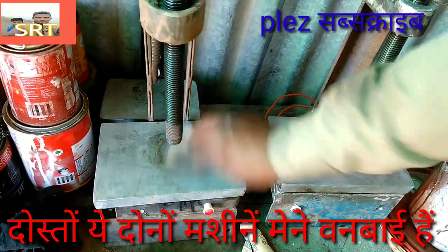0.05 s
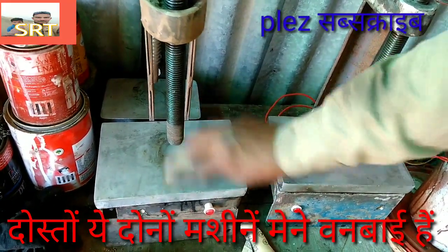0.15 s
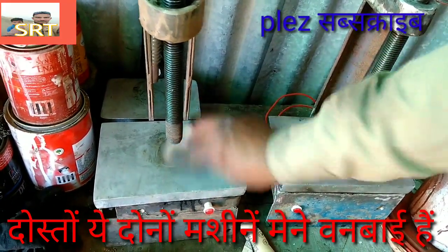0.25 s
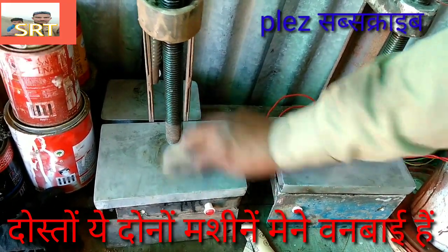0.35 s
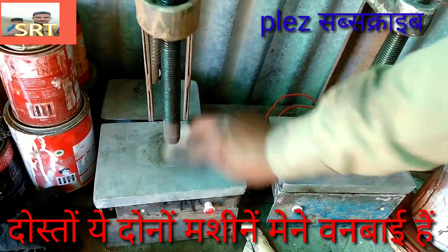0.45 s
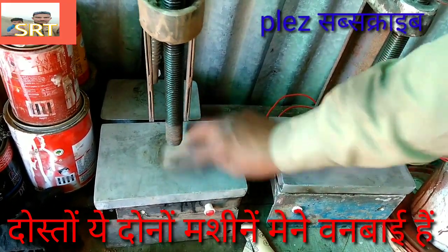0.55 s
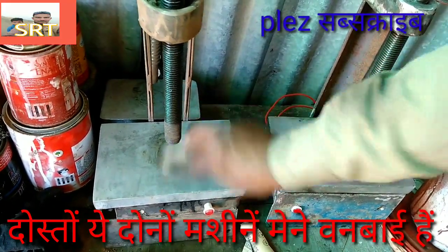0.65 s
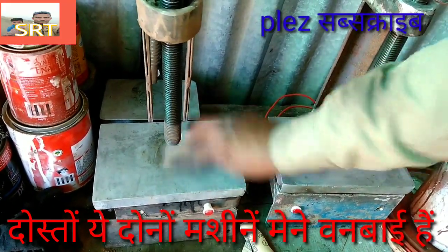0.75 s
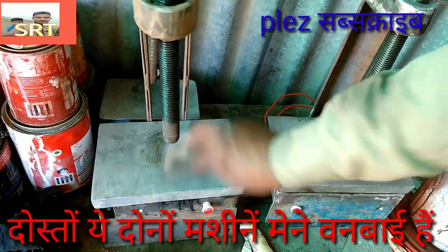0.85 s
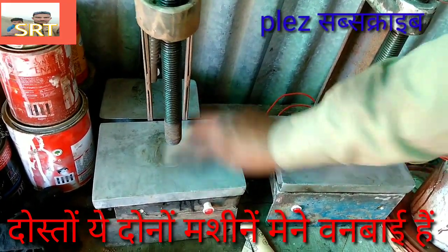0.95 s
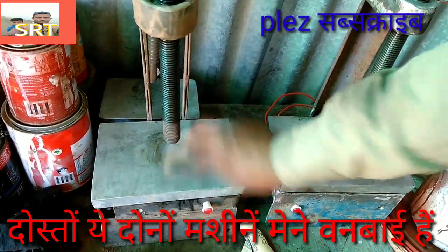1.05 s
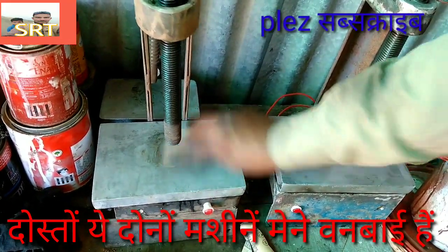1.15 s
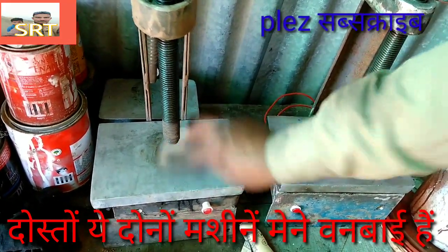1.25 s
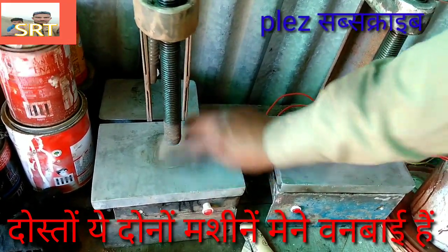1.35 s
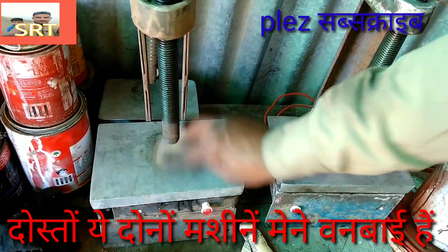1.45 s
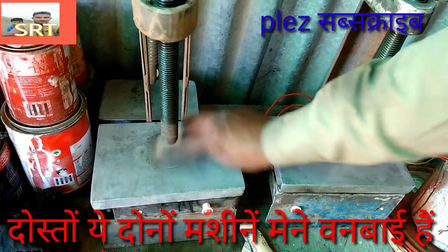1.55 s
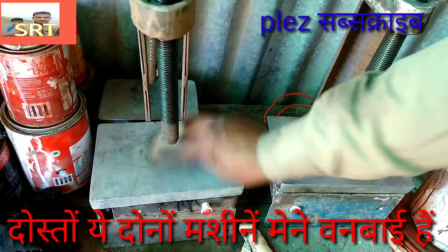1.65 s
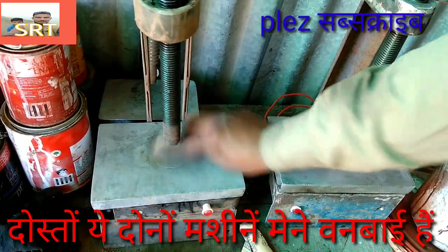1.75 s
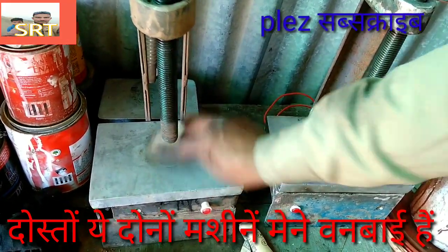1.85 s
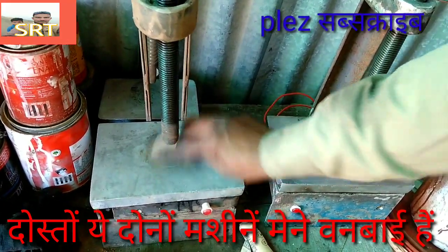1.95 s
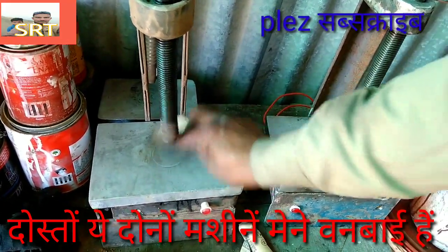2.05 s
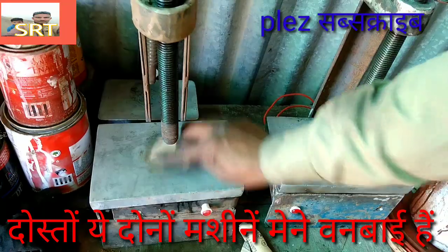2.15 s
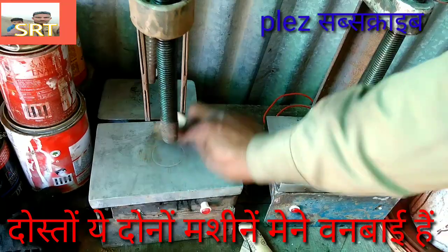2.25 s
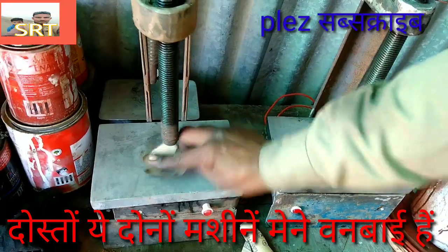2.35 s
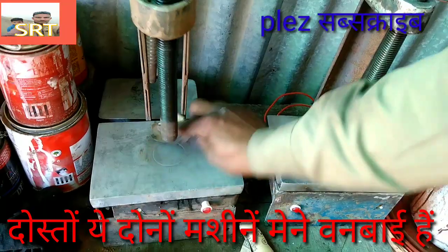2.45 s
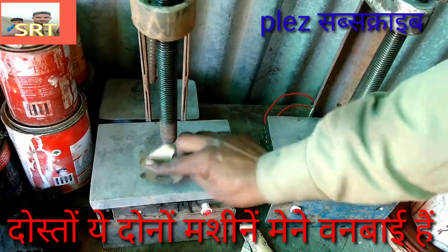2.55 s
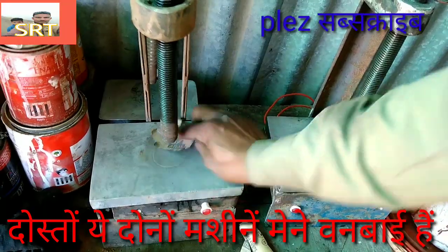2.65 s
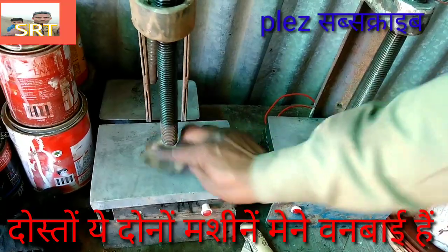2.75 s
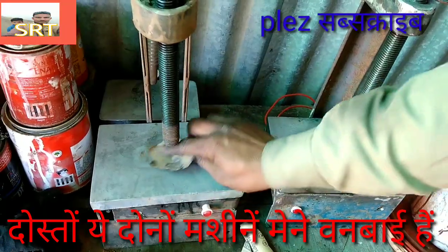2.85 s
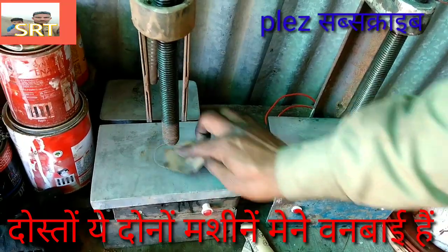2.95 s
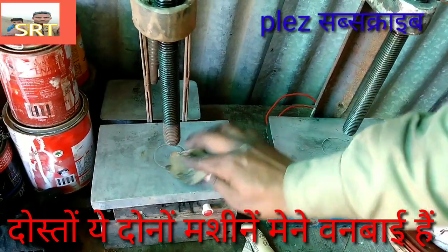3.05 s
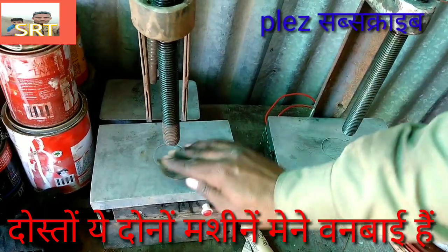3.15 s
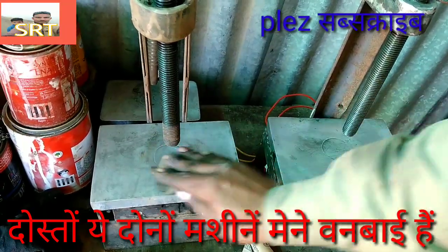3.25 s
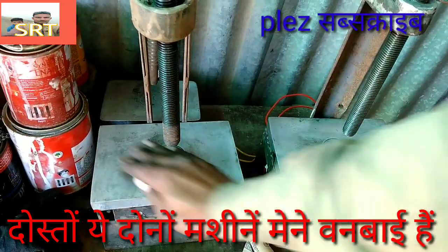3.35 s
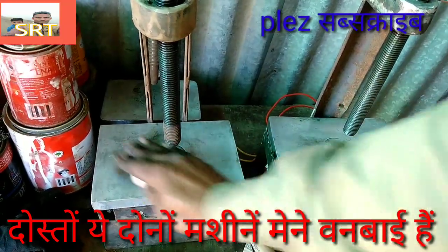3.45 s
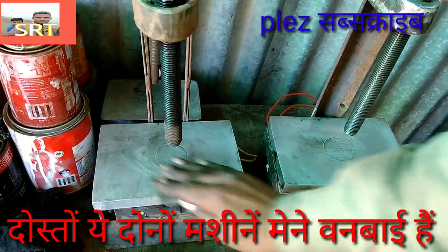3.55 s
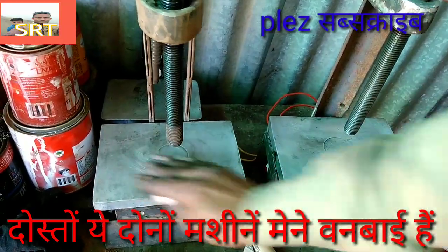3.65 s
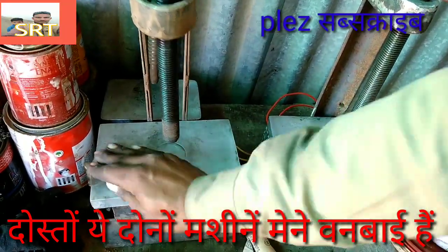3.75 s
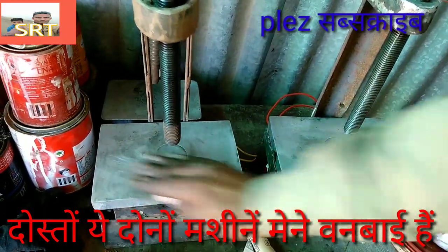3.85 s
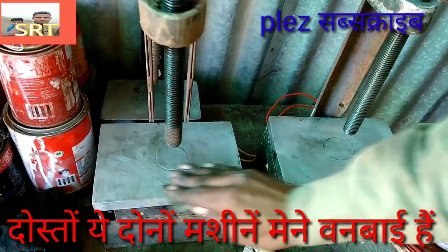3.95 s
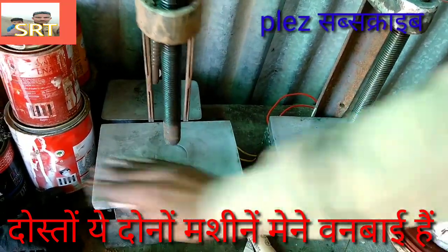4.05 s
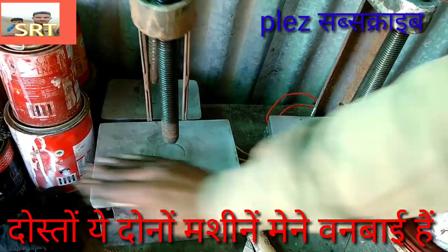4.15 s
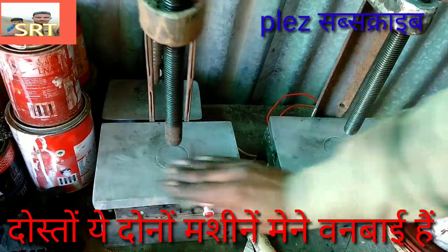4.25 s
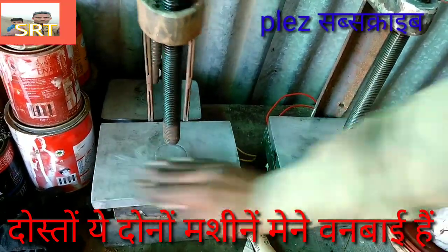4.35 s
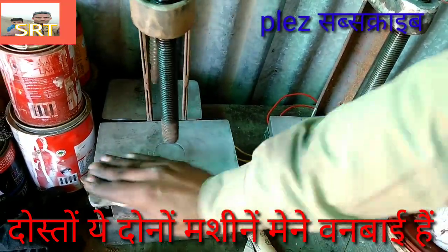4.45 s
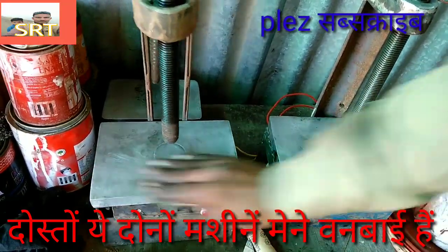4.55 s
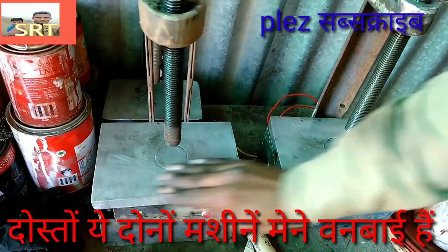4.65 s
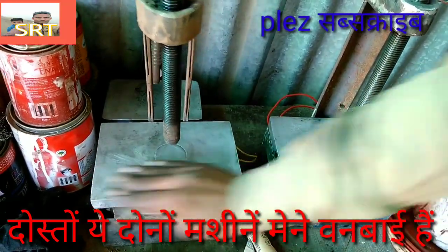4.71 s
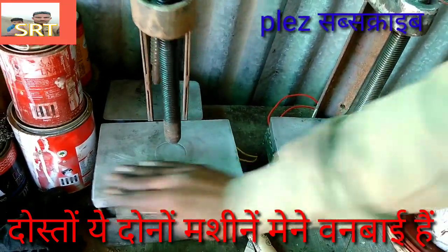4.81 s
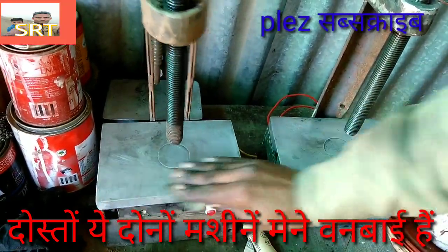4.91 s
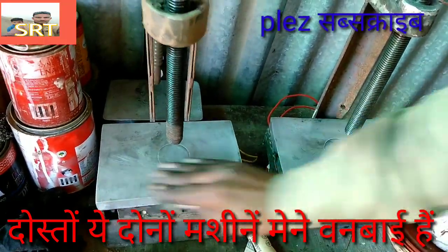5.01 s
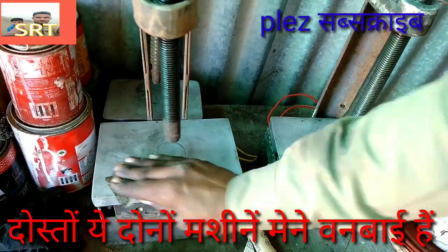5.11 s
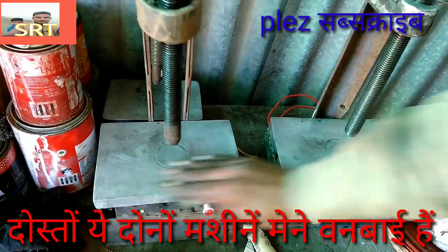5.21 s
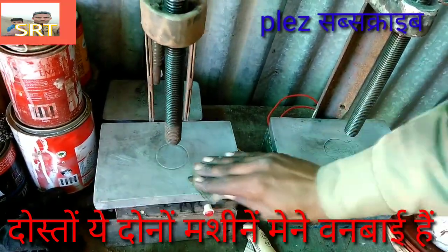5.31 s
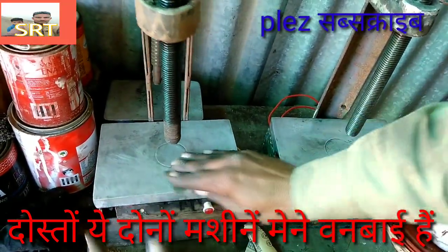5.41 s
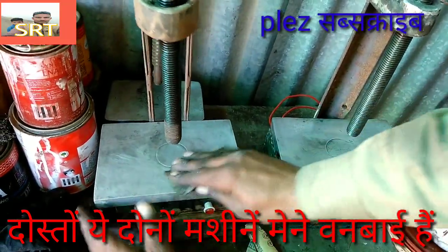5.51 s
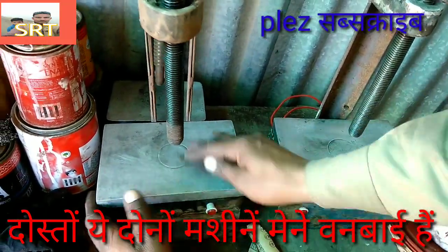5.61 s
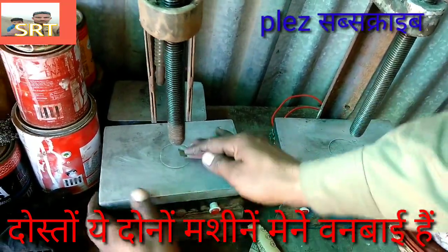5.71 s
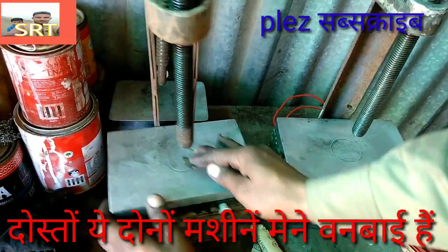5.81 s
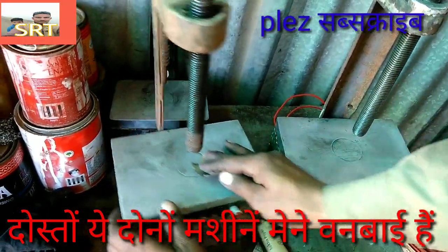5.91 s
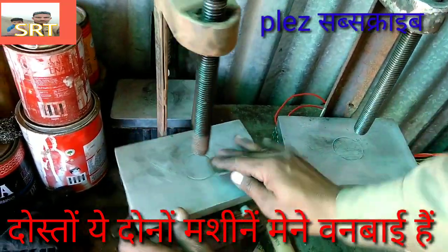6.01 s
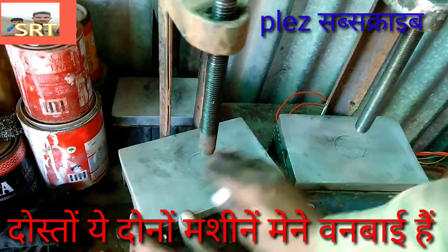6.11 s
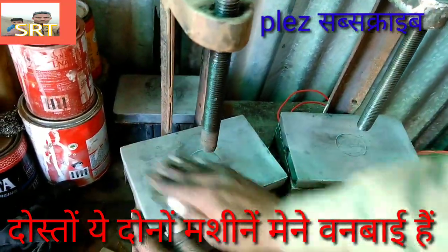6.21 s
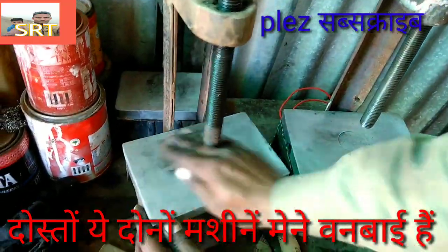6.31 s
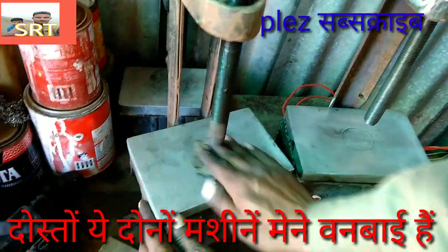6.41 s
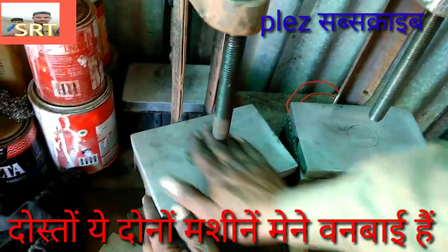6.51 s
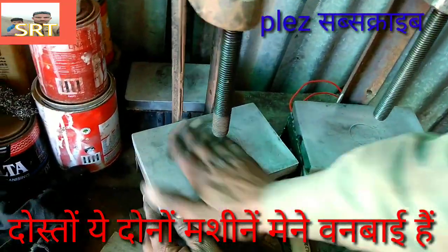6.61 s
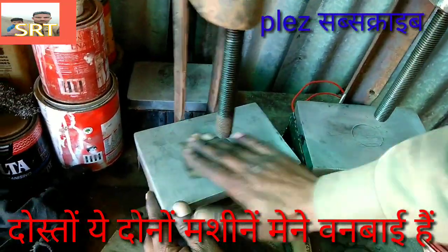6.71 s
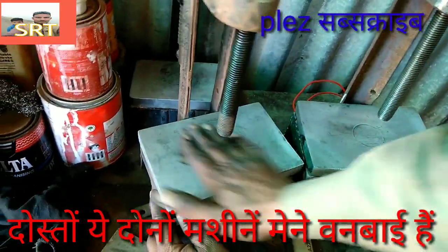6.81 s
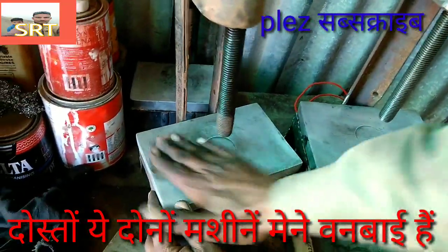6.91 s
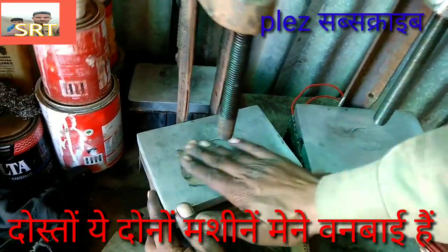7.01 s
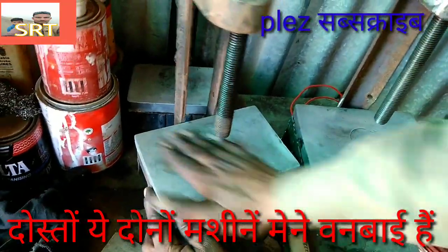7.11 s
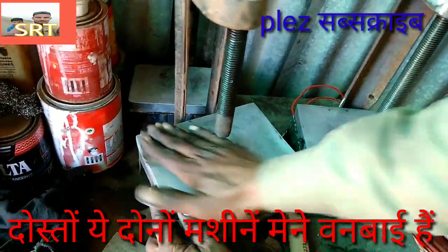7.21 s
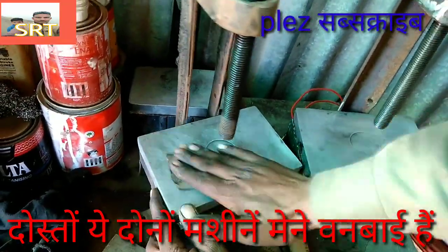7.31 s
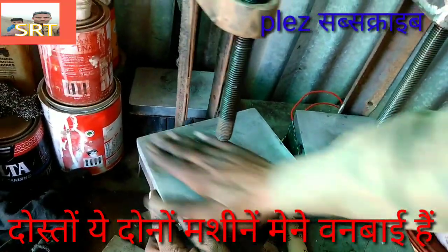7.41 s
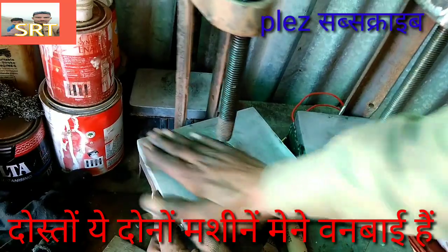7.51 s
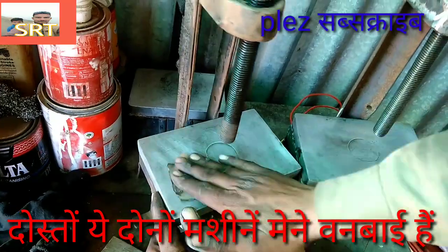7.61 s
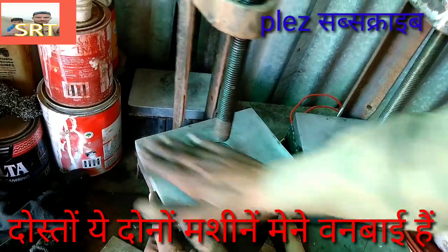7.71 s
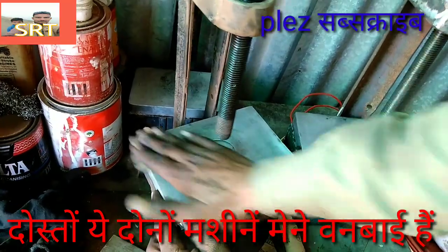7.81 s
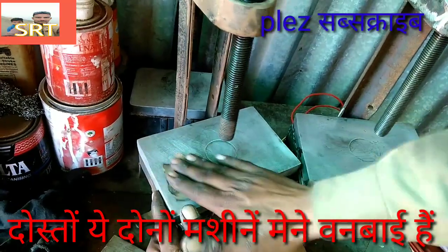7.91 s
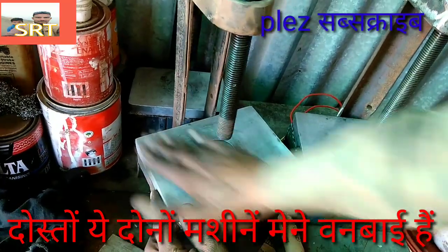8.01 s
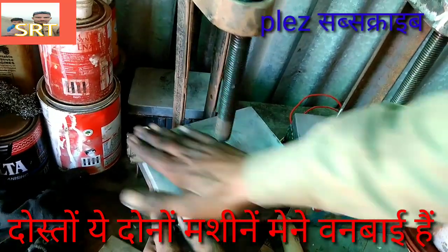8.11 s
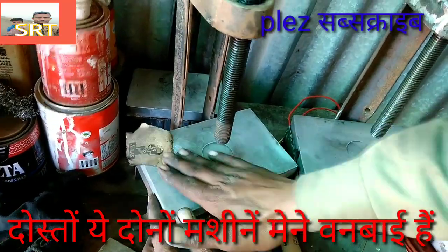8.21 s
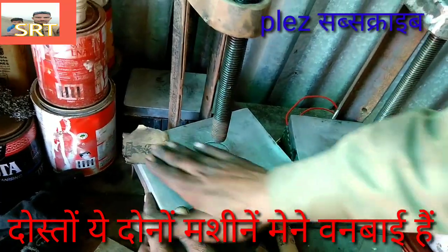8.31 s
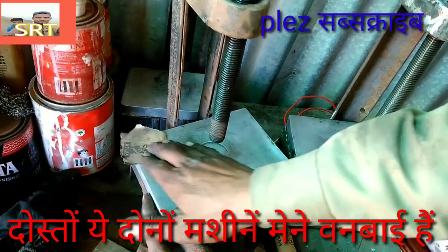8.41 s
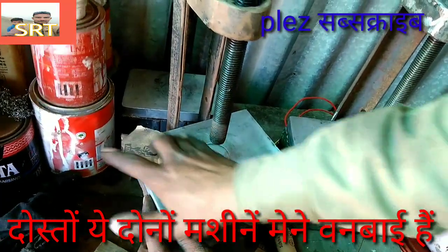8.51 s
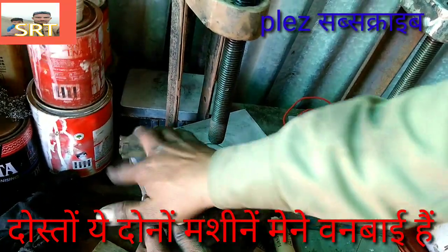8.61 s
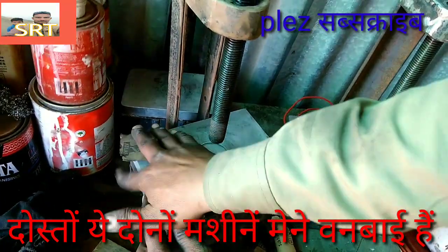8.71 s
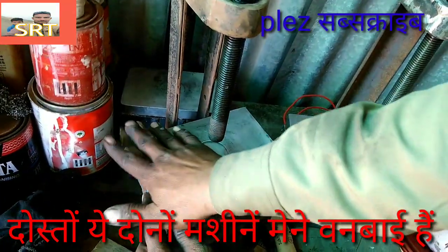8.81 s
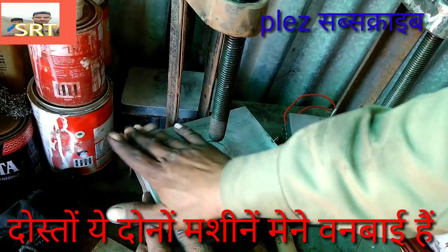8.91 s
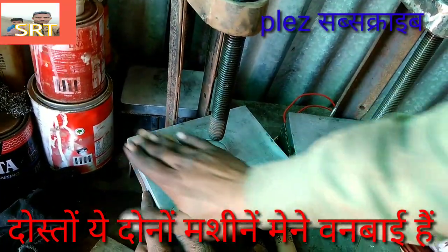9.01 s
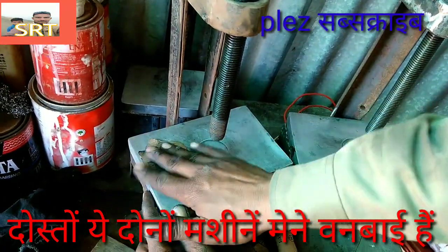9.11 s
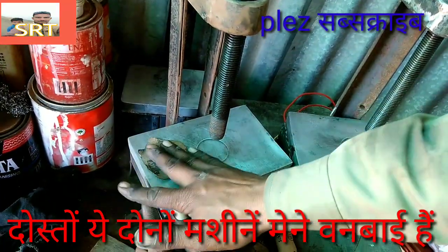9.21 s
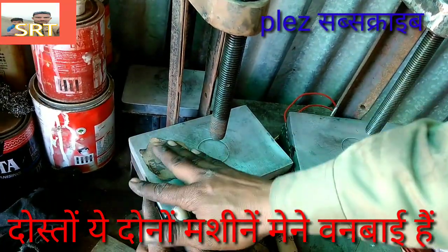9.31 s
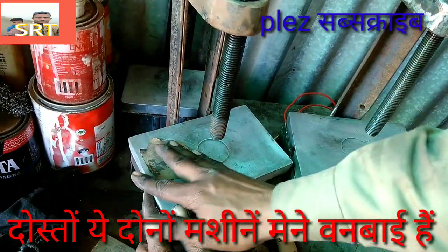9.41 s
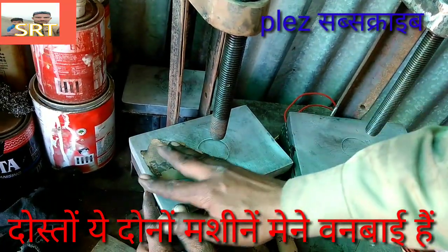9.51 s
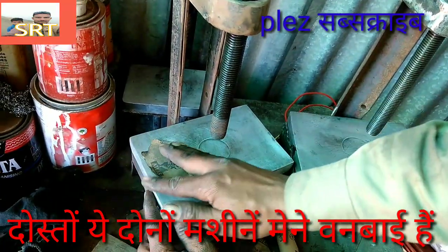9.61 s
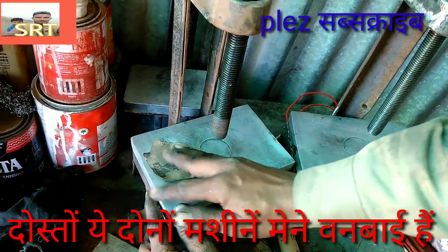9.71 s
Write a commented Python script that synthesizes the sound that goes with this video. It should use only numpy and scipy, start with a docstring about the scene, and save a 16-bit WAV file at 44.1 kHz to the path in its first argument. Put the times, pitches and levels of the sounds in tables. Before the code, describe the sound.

Close, dry stereo in a small tin-walled workshop with a faint low rumble. From 0 to 2.8 seconds sandpaper scrubs a steel plate in very quick strokes, about ten a second, each a bright gritty hiss with a thinner rasp; dull thuds and short clanks become denser after 2 seconds. Around 2.9 to 3.3 the rubbing weakens, with a scuff and papery snap. From 3.3 to 5.5 come longer, steadier sweeps, about six a second, with heavy knocks and juddering rumble, and a soft distant wash rising. At 5.7 to 6.1 the plate is swung round with a low grind, gritty crackle and sharp paper snaps. A long stroke follows, then brisk sweeps until 8.3, with the hardest clanks near 7.3 and 7.9. Afterwards light slides, one weak stroke around 9 with a snap, and faint wavering far-off tones.

```python
"""Sandpaper hisses and rasps over a steel plate in a small tin-walled workshop: quick short strokes, then longer sweeps.
The loose plate knocks and rumbles on its press, and midway it is swung round with a low grinding.
At the end the paper only slides lightly, and faint tones drift in from far away.
The paper is coloured noise driven by the speed of the hand; the knocks are blows and tiny bounces that ring
decaying modes; the rumble is low juddering noise; noise-like echoes make the room."""
import sys
import numpy as np
from scipy import signal
from scipy.fft import rfft, irfft
from scipy.io import wavfile
from scipy.ndimage import uniform_filter1d, map_coordinates

SR = 44100
rng = np.random.default_rng(int(sys.argv[2]) if len(sys.argv) > 2 else 0)


def persist_wave(psi):
    """Save psi, clipped to +-1, as 16-bit WAV."""
    counts = np.round(np.clip(psi, -1, 1) * 32767).astype(np.int16)
    wavfile.write(sys.argv[1], SR, np.atleast_2d(counts).T)


N = 430416
TIME = np.arange(N) / SR
BINS_HZ = np.maximum(np.fft.rfftfreq(N, 1 / SR), 1)

# All levels in the tables are relative: each layer's own trim and the room come on top.

# Workshop background colour. Each row: frequency in Hz, density in dB per Hz.
AMBIENCE_COLOUR = [(18, -2), (27, 8), (42, -6), (65, -3.5), (95, -6), (170, -15), (300, -12), (550, -14),
                   (750, -59), (1700, -54), (3000, -31.5), (8000, -31), (15000, -42)]
# A distant wash that swells and fades. Each row: time in seconds, level in dB.
WASH_LEVEL = [(0, -90), (3.3, -58), (3.9, -35), (4.7, -39), (5.5, -32.5), (6.1, -30.5), (6.6, -42.5),
              (8.2, -77), (8.6, -44.5), (9.3, -50.5), (9.75, -40)]
# Colour of the wash. Each row: frequency in Hz, density in dB per Hz.
WASH_COLOUR = [(200, 3), (600, 5), (900, 4), (1500, 4), (2200, 1.5), (3200, -12), (6000, -21)]
# Faint far hum and tones. Each row: start in seconds, end in seconds, level in dB, from Hz, to Hz.
FAR_TONES = [(8.504, 9.85, -45, 95, 91), (8.5, 8.88, -54, 2000, 1745), (8.85, 9.18, -46.5, 1700, 1800),
             (9.2, 9.9, -45.5, 190, 192), (9.34, 9.62, -46.5, 838, 805), (9.41, 9.9, -44, 618, 592),
             (9.4, 9.68, -49, 1800, 1605)]
# Likeness of the left and right channels. Each row: frequency in Hz, correlation from -1 to 1.
LIKENESS = [(60, .98), (190, .98), (330, .85), (500, .3), (800, .1), (2000, .2), (5000, .3), (9000, .37),
            (15000, .28)]
# Room decay. Each row: frequency in Hz, time to fall by 60 dB in seconds.
ROOM_T60 = [(120, 0.48), (500, 0.26), (1500, 0.23), (4000, 0.063), (12000, 0.031)]

# How much the plate rocks under the hand. Each row: time in seconds, rumble level in dB.
ROCKING = [(0.0, -33.5), (0.73, -44.5), (2.66, -25.5), (3.48, -41.5), (4.13, -23), (5.06, -21), (5.72, -34),
           (6.0, -15), (6.25, -26.5), (6.77, -28.5), (7.07, -29), (8.22, -19), (8.46, -21.5), (8.68, -31),
           (9.76, -41.5)]
# The plate shifts on its seat, shoved by the hand or settling after a knock. Each row: start in seconds, end in
# seconds, level in dB.
SHOVES = [(0.428, 0.499, -20), (0.913, 0.98, -31.5), (1.297, 1.348, -32.5), (1.502, 1.54, -28),
          (1.61, 1.66, -28), (1.695, 1.776, -26), (1.91, 1.954, -26), (3.787, 3.827, -22.5),
          (4.005, 4.11, -25.5), (4.689, 4.763, -21.5), (5.357, 5.458, -26.5), (5.786, 6.02, -21.5),
          (6.018, 6.1, -16.5), (6.9, 6.958, -21), (7.12, 7.205, -19), (7.3, 7.363, -21.5),
          (7.563, 7.657, -17.5), (7.787, 7.88, -17.5), (8.765, 8.867, -29)]
# Colour of the plate's rumble. Each row: frequency in Hz, density in dB per Hz.
GRIND_COLOUR = [(40, -30), (68, -9.5), (98, -3.5), (140, 3.5), (195, -3), (280, 0.5), (320, -5.5), (370, 4),
                (410, -4.5), (465, 6), (530, 0), (590, -5.5), (650, -6), (750, -14.5), (1200, -14.5),
                (2000, -28), (4000, -31.5)]
# The plate scrapes round on its seat. Each row: start in seconds, end in seconds, level in dB.
SCRAPES = [(5.81, 6.028, -35.5), (6.018, 6.13, -32)]
# The plate knocks on its seat. Each row: time in seconds, thud in dB, clank in dB.
KNOCKS = [(0.438, -11, -19.5), (0.462, -6.5, -16.5), (0.91, -18, -41), (1.128, -25, -40), (1.297, -18, -35),
          (1.329, -23, -35), (1.497, -14, -27), (1.63, -22, -40), (1.68, -11.5, -32), (1.704, -14, -26),
          (1.764, -13, -26), (1.906, -9.5, -35), (1.958, -8.5, -26), (2.094, -7, -20), (2.119, -6, -25),
          (2.29, -5, -26), (2.321, -7, -17), (2.514, -5.5, -18.5), (2.539, -7.5, -17.5), (2.568, -1, -17),
          (2.718, -14, -46), (2.746, -12, -25), (2.777, 2, -14.5), (3.002, -16, -34.5), (3.793, -4, -13),
          (3.818, -7, -19.5), (4.145, 1, -26), (4.178, -5, -21), (4.477, -4.5, -32), (4.506, -6, -19),
          (4.522, -4.5, -20.5), (4.744, -14, -25), (4.837, -2.5, -26), (4.871, -4.5, -20),
          (4.89, -7, -15.5), (5.083, -11, -49), (5.143, -1.5, -30), (5.169, -3, -19), (5.493, -4.5, -37),
          (5.529, -8, -31), (5.8, -5, -31), (5.918, -16, -35), (5.984, -14, -32), (6.023, -8, -23),
          (6.076, -10.5, -25.5), (6.105, -11.5, -31), (6.155, -15, -30), (6.255, -16, -26),
          (6.415, -1, -15), (6.738, -18.5, -52), (6.785, -12, -31), (6.904, -10.5, -32), (6.982, -4.5, -35),
          (7.022, -3, -16), (7.144, -14, -31), (7.228, -2.5, -30), (7.286, 0, -8), (7.319, -3, -28),
          (7.485, -21, -43), (7.54, -8, -29), (7.584, -4, -16.5), (7.808, -8.5, -15.5), (7.846, -1.5, -28),
          (7.858, -0.5, -10), (7.884, -6, -24), (7.959, -13.5, -43), (8.073, -7, -35), (8.162, -4, -18.5),
          (8.326, -16, -62), (8.375, -14.5, -61)]
# Modes of plate and press frame. Each row: frequency in Hz, level in dB, 60 dB decay in seconds,
# left-right balance in dB.
MODES = [(95, -25, 0.037, 0), (148, -11.5, 0.068, 8), (226, -9, 0.064, 2), (282, -3, 0.036, 3),
         (373, 0, 0.05, 1.5), (461, -2, 0.051, 8.5), (525.5, -2, 0.038, 5), (649, -9.5, 0.052, 12),
         (716, -15, 0.064, 3), (780, -12, 0.022, -7), (880, -1, 0.016, -7.5), (1112, -6, 0.062, -1),
         (1220, -3, 0.027, 5.5), (1600, -7, 0.056, -4), (1804, -2.5, 0.035, -8.5), (1952, -2, 0.027, 5),
         (2336, -16, 0.076, -7), (2643, -7, 0.041, -1), (2822, -5.5, 0.076, 0), (3000, -11.5, 0.034, 3)]

# Paper sliding with little pressure. Each row: start in seconds, end in seconds, level in dB.
SLIDES = [(8.338, 8.453, -38.5), (8.418, 8.824, -29.5), (8.881, 9.037, -33), (9.19, 9.306, -34.5),
          (9.316, 9.45, -38.5), (9.528, 9.624, -38), (9.603, 9.793, -52)]
# Colour of the light slides. Each row: frequency in Hz, density in dB per Hz.
SLIDE_COLOUR = [(2000, -27), (3800, -13.5), (4900, 5), (6100, 3), (7200, -17), (8600, 7), (10000, 4),
                (11500, 2), (13500, -13), (15400, -9)]
# Finger scuffs and plate scratches. Each row: start in seconds, end in seconds, level in dB, centre in Hz.
SCUFFS = [(3.114, 3.192, -26, 3930), (5.82, 5.859, -25.5, 1750), (5.973, 6.055, -38, 3750),
          (6.22, 6.29, -37, 3000), (6.372, 6.475, -28, 3000), (8.968, 9.091, -41, 1950)]
# The stiff sheet snaps as it bends. Each row: time in seconds, level of the crack in dB.
SNAPS = [(2.983, -28), (3.288, -21), (5.989, -17.5), (6.043, -12), (8.975, -16.5), (9.331, -30.5)]
# Passes of the paper, from the bite of the grit to the next turn of the hand. Each row: start in seconds,
# end in seconds, hiss in dB and rasp in dB at full speed, relative dB while the paper rolls before the bite.
STROKES = [(0.01, 0.088, -8.5, -23, -8.5), (0.1, 0.19, -7.5, -23.5, -8), (0.203, 0.298, -6.5, -24, -10),
           (0.298, 0.386, -9.5, -27.5, -11), (0.405, 0.497, -7.5, -22.5, -10),
           (0.502, 0.577, -6.5, -23.5, -8), (0.604, 0.678, -6, -23.5, -7.5), (0.69, 0.78, -8.5, -24.5, -10),
           (0.792, 0.88, -6.5, -22, -9), (0.886, 0.981, -10, -24.5, -9), (0.994, 1.074, -4.5, -19, -9.5),
           (1.086, 1.177, -9, -24.5, 4), (1.189, 1.274, -5.5, -22.5, -6), (1.282, 1.374, -10, -27, -18),
           (1.393, 1.481, -7.5, -21.5, -9), (1.485, 1.565, -9.5, -24.5, -5), (1.588, 1.675, -7, -23, -10.5),
           (1.692, 1.775, -11, -23.5, -0.5), (1.797, 1.87, -6.5, -21, -7.5), (1.886, 1.982, -12, -26.5, -1),
           (2.002, 2.084, -8, -21, -10.5), (2.105, 2.191, -10.5, -26.5, -4), (2.218, 2.297, -9, -24, 0.5),
           (2.31, 2.419, -12, -24.5, -6), (2.442, 2.516, -9, -23, -4), (2.544, 2.63, -10, -23.5, -5),
           (2.649, 2.726, -10.5, -20.5, -7), (2.746, 2.864, -17.5, -26.5, -12),
           (2.913, 3.095, -20.5, -33, 2), (3.105, 3.211, -26.5, -33, -7), (3.222, 3.314, -27, -41, -4),
           (3.326, 3.476, -13.5, -29.5, -9), (3.505, 3.657, -12.5, -26.5, -7.5),
           (3.669, 3.826, -12.5, -26, -19), (3.846, 4.006, -11.0, -26, -1),
           (4.018, 4.168, -10.5, -26.5, -13), (4.199, 4.355, -9, -21.5, -10),
           (4.369, 4.507, -8.5, -24, -12), (4.529, 4.681, -9.5, -22, -5.5), (4.697, 4.829, -11, -26, -25),
           (4.865, 5.014, -10, -24, -4), (5.035, 5.17, -11, -27.5, -14), (5.198, 5.355, -9.5, -23, -4),
           (5.384, 5.508, -18, -31, -9), (5.588, 5.695, -20.5, -33.5, -6), (5.727, 5.995, -37.5, -41, -9),
           (5.984, 6.164, -30.5, -34, -9), (6.182, 6.537, -12.5, -28, -7), (6.571, 6.688, -16.5, -27.5, -2),
           (6.639, 6.855, -20, -30.5, -18), (6.864, 7.029, -17, -30, 3), (7.029, 7.122, -13, -26, -2),
           (7.15, 7.297, -14.5, -28, -2), (7.303, 7.421, -14, -25, -3), (7.443, 7.563, -14.5, -29, -12),
           (7.591, 7.72, -13.5, -28, -8), (7.738, 7.872, -14.5, -25.5, -14),
           (7.904, 8.021, -12.5, -27, -1.5), (8.047, 8.171, -12.5, -26, -7), (8.204, 8.314, -22, -35.5, 1),
           (8.98, 9.198, -23.5, -36.5, -6)]
# Grit on steel. Each row: frequency in Hz, density in dB per Hz.
HISS_COLOUR = [(2500, -35), (4300, -16), (5500, -10.5), (7000, -8.5), (8000, -6), (8800, 0.5), (9900, -1),
               (11000, -4), (12500, -7), (14000, -10.5), (15400, -6)]
# Balance of the hiss; its brightest part leans right. Each row: frequency in Hz, left-right dB.
HISS_PAN = [(4000, 3), (6000, 0), (9000, -3.0), (11000, -3), (14000, -0.5)]
# Rasp of the paper backing under the fingertips. Each row: frequency in Hz, density in dB per Hz.
RASP_FINGERS = [(300, -9), (900, -8), (1500, -8), (2000, -0.5), (2350, -2.5), (2800, 6), (3500, 7.5),
                (4200, -3), (5500, -2.5)]
# The same rasp under the flat hand. Each row: frequency in Hz, density in dB per Hz.
RASP_PALM = [(300, -6), (900, -6), (1500, -6), (2200, 1.5), (2900, 4), (3500, 4), (4100, 2), (5500, -1)]

# the flat hand takes over from the fingertips
PALM_FROM_S = 3.3
# fingertips only tip the plate; it takes the flat hand to shake the deep modes of the frame fully
FINGERS_DEEP_DB = -4.5
# once swung round, the plate overhangs its seat and its top modes ring louder
SWUNG_S, OVERHANG_DB = 6.8, 5
SHOVE_ATTACK_S, SHOVE_RELEASE_S = 0.018, 0.052
# a light rumble is smooth; it judders fully from this level up
FULL_JUDDER_DB = -23
# the hand's run-up and slow-down; it loops round at a share of full speed
SPEED_UP_S, SLOW_DOWN_S, TURN_SHARE = 0.12, 0.071, 0.11
# after a turn the paper rolls over for ROLL_S, then bites within BITE_S
ROLL_S, BITE_S = 0.033, 0.0052
# the slacker the roll, the harder the grit grabs: a share of the dip comes back as a brief overshoot
GRAB_SHARE, GRAB_S = 0.17, 0.02
# the two microphones sit close together, so below this they hear nearly the same
ALIKE_BELOW_HZ = 215
CUTOFF_HZ = 15600


def from_db(db):
    """Decibels to gain."""
    return 10 ** (np.asarray(db) / 20)


def rms_one(x):
    """Scale to unit power."""
    return x / np.sqrt(np.mean(x ** 2) + 1e-20)


def at_hz(points, hz):
    """Read a table on a log-frequency axis."""
    table_hz, value = np.transpose(points)
    return np.interp(np.log(hz), np.log(table_hz), value)


def band(x, low_hz, high_hz):
    """Causal band-pass."""
    edges_hz = [low_hz, min(high_hz, 0.45 * SR)]
    return signal.sosfilt(signal.butter(2, edges_hz, "band", fs=SR, output="sos"), x + 1e-18)


def fade_out(x, decay_s):
    """Give every impulse an exponential tail that falls to 1/e in decay_s."""
    return signal.lfilter([1], [1, -np.exp(-1 / (decay_s * SR))], x + 1e-18)


def gate(start, end, fade_s):
    """A level stretch with soft ends: (its samples, its gain)."""
    span = slice(max(int(start * SR), 0), min(int(end * SR), N))
    to_edge_s = np.minimum(TIME[span] - start, end - TIME[span])
    return span, np.sin(np.pi / 2 * np.clip(to_edge_s / fade_s, 0, 1))


def flutter(rate):
    """Random motion of unit rms, sliding between about rate new values a second."""
    knots = rng.standard_normal(N // 8)
    return rms_one(np.interp(TIME * rate, np.arange(len(knots)), knots))


def stereo(mid, side, alike):
    """Left and right from two unrelated signals, with the given likeness."""
    return np.sqrt((1 + alike) / 2) * mid + np.sqrt((1 - alike) / 2) * side * [[1], [-1]]


def panned(left_right_db):
    """Split a left-right difference in dB evenly between the two sides, still in dB."""
    return left_right_db * np.array([[0.5], [-0.5]])


def friction(colour, grain_db=0., lag_s=0.):
    """Stereo noise of countless tiny contacts, uneven in strength, coloured by what radiates them; rms 1."""
    contacts = rng.standard_normal((2, N)) * from_db(grain_db * flutter(2200))
    mid, side = rfft(contacts)
    alike = np.clip(at_hz(LIKENESS, BINS_HZ), -1, 1)
    pair = stereo(mid, side, alike)
    pair[0] *= np.exp(-2j * np.pi * BINS_HZ * lag_s)  # sound reaches the left microphone later
    # roll off beyond both ends of the colour table
    below = 1 + (1.66 * colour[0][0] / BINS_HZ) ** 4
    above = 1 + (BINS_HZ / colour[-1][0] / 2) ** 4
    skirts = 1 / np.sqrt(below * above)
    return rms_one(irfft(pair * from_db(at_hz(colour, BINS_HZ)) * skirts, N))


def background(floor_db=-43.5, blur=1.3, tone_fade_s=0.093):
    """A steady rumble, a far wash and a few faint tones, blurred by distance."""
    rumble = from_db(floor_db) * friction(AMBIENCE_COLOUR)
    wash_level = from_db(np.interp(TIME, *np.transpose(WASH_LEVEL)))
    out = rumble + wash_level * friction(WASH_COLOUR)
    for start, end, db, from_hz, to_hz in FAR_TONES:
        span, gain = gate(start, end, tone_fade_s)
        phase = 2 * np.pi * np.cumsum(np.linspace(from_hz, to_hz, len(gain))) / SR
        # wandering level and phase, separate on each side
        echoes = blur * np.array([flutter(45)[span] + 1j * flutter(45)[span] for _ in range(2)])
        tone = rms_one(np.real((1 + echoes) * np.exp(1j * phase)))
        out[:, span] += from_db(db) * gain * tone
    return out


def workshop(x):
    """Dense reflections from near walls; the treble dies first and the bass is alike on both sides."""
    age = np.arange(SR * 3 // 5) / SR
    edges_hz = np.geomspace(60, 18000, 9)
    echo = 0
    for low_hz, high_hz in zip(edges_hz, edges_hz[1:]):
        centre_hz = np.sqrt(low_hz * high_hz)
        alike = np.clip(at_hz(LIKENESS, centre_hz), -1, 1)
        mid, side = rng.standard_normal((2, len(age)))
        build_up = np.clip(age / 0.0067, 0, 1)
        decay = from_db(-60 * age / at_hz(ROOM_T60, centre_hz)) * build_up
        reflections = stereo(mid, side, alike) * decay / np.sqrt(np.sum(decay ** 2))
        echo = echo + band(reflections, low_hz, high_hz)
    return signal.fftconvolve(x, echo, axes=1)[:, :N]


def rocking_db(s):
    """Level of the plate's rumble at the given times, before its trim."""
    return np.interp(s, *np.transpose(ROCKING))


def grinding(knocks, rumble_db=-9.5, judder_db=3.0, shake_db=-18, shake_s=0.062):
    """The plate rumbles as it rocks and judders on its seat when shoved; each knock shakes the whole bench too."""
    power = from_db(rumble_db + rocking_db(TIME)) ** 2
    for start, end, db in SHOVES:
        attack = np.clip((TIME - start) / SHOVE_ATTACK_S, 0, 1)
        release = np.exp(-np.clip((TIME - end) / SHOVE_RELEASE_S, 0, 20))
        power += (from_db(db) * attack * release) ** 2
    jolts = np.zeros(N)
    for s, thud_db, _ in knocks:
        jolts[int(s * SR)] += from_db(thud_db + shake_db) ** 2
    power += fade_out(jolts, shake_s / 2)  # power fades twice as fast as level
    level = np.sqrt(power)
    judder = judder_db * np.minimum(level / from_db(FULL_JUDDER_DB), 1) * flutter(90)
    return level * rms_one(friction(GRIND_COLOUR) * from_db(judder))


def scraping(grains_per_s=290.0, size_db=4.0, grain_s=0.0011, low_hz=850., high_hz=3600.):
    """Dirt is crushed under the plate as it is swung round: a coarse crackle of noise bursts."""
    level = np.zeros(N)
    for start, end, db in SCRAPES:
        span, gain = gate(start, end, 0.025)
        level[span] += from_db(db) * gain
    crushed = rng.random(N) < grains_per_s / SR
    sizes = from_db(size_db * np.minimum(rng.exponential(1, N), 3))
    bursts = fade_out(crushed * sizes, grain_s)
    return level * rms_one(band(bursts * rng.standard_normal((2, N)), low_hz, high_hz))


def clacks(clack_db=0.0, decay_s=0.026, touches_per_s=1500., low_hz=700., high_hz=3670.0):
    """Steel meets steel: each listed knock opens with a short, dry crackle of contacts."""
    age = np.arange(N // 100) / SR
    share = touches_per_s / SR
    out = np.zeros((2, N))
    for s, _, clank_db in KNOCKS:
        touched = rng.random(len(age)) < share
        touches = touched * rng.standard_normal((2, len(age))) / np.sqrt(share)
        at = int(s * SR)
        out[:, at:at + len(age)] += from_db(clack_db + clank_db) * touches * np.exp(-age / decay_s)
    return band(out, low_hz, high_hz)


def ring(drive, hz, t60, lead):
    """One decaying mode, heard with a phase difference between left and right."""
    radius, step = from_db(-60 / (t60 * SR)), 2 * np.pi * hz / SR
    poles = [1, -2 * radius * np.cos(step), radius * radius]
    sides = []
    for phase in (lead / 2, -lead / 2):
        zeros = [np.sin(phase), radius * np.sin(step - phase)]
        sides.append(signal.lfilter(zeros, poles, drive + 1e-18))
    return np.array(sides)


def plate(knocks, thud_db=-6.0, clank_db=-2.5, chatter_s=0.0096, chatter=0.1, rattle_s=0.017, rattle=0.27,
          bounce_per_s=1000.):
    """Each knock drives the lower modes with a blow and dying bounces, the high ones with a building rattle."""
    age = np.arange(N // 100) / SR
    blow = (age == 0) * 1.
    bounced = rng.random((len(knocks), len(age))) < bounce_per_s / SR
    bounces = bounced / np.sqrt(bounce_per_s / SR)
    rattling = rattle * (1 - np.exp(-age / 0.004)) * np.exp(-age / rattle_s)
    chattering = chatter * np.exp(-age / chatter_s)
    out = np.zeros((2, N))
    for k, (hz, mode_db, t60, pan_db) in enumerate(MODES):
        deep, high, top = hz < 300, hz > 800, hz > 2200
        drive = np.zeros(N)
        for (s, low_db, high_db), touches in zip(knocks, bounces):
            ticks = 0.5 * touches * rng.standard_normal(len(age))
            if high:
                overhang_db = OVERHANG_DB * (top and s > SWUNG_S)
                force = from_db(clank_db + high_db + overhang_db) * ticks * rattling
            else:
                tipping_db = FINGERS_DEEP_DB * (deep and s < PALM_FROM_S)
                force = from_db(thud_db + low_db + tipping_db) * (blow + ticks * chattering)
            place_db = 2 * rng.standard_normal()  # each point of contact favours other modes
            at = int(s * SR)
            drive[at:at + len(age)] += from_db(place_db) * force
        # a mode radiates only near its own pitch
        drive = band(drive, hz / 2, hz * 2)
        # the bass reaches both microphones in step, higher modes reach the left one later
        lead = -np.clip((hz - 440) / 250, 0, 1.6)
        polarity = (-1) ** k
        out += polarity * from_db(mode_db + panned(pan_db)) * ring(drive, hz, t60, lead)
    return out


def handling(slide_fade_s=0.069, scuff_fade_s=0.02, snap_s=0.0058, snap_db=0.):
    """Light slides, scuffs and snaps of the sheet: gated friction, narrow noise and bright decaying cracks."""
    sliding, cracks = np.zeros((2, N))
    for start, end, db in SLIDES:
        span, gain = gate(start, end, slide_fade_s)
        sliding[span] += from_db(db) * gain
    out = sliding * friction(SLIDE_COLOUR, grain_db=3.0)
    for start, end, db, hz in SCUFFS:
        span, gain = gate(start, end, scuff_fade_s)
        scuff = rms_one(band(rng.standard_normal((2, len(gain))), hz / 1.32, hz * 1.14))
        out[:, span] += from_db(db) * gain * scuff
    for s, db in SNAPS:
        cracks[int(s * SR)] = from_db(db + snap_db)
    cracks = fade_out(cracks, snap_s)
    return out + band(cracks * rng.standard_normal((2, N)), 3500, 12300)


def pass_speed(t, turn, end):
    """The hand speeds up after a turn and slows into the next one; share of full speed."""
    way = np.clip(np.minimum((t - turn) / SPEED_UP_S, (end - t) / SLOW_DOWN_S), 0, 1)
    return TURN_SHARE + (1 - TURN_SHARE) * np.sin(np.pi / 2 * way)


def snags(per_s=89.0, size=0.39, decay_s=0.0001):
    """Now and then a coarse grain digs in and tears free: a brief rise in gain."""
    born = rng.random(N) < per_s / SR
    heights = size * np.minimum(rng.exponential(1, N), 3)
    return 1 + fade_out(born * heights, decay_s)


def shifting(x, patchy_db, count=26):
    """The patch of paper in contact keeps changing, so each part of the spectrum flickers by itself."""
    hz, times, frames = signal.stft(x, nperseg=512)
    knots = rng.standard_normal((count + 2, len(times)))
    # count regions across the spectrum, a new random value every five frames
    where = np.meshgrid(hz / hz[-1] * count, np.arange(len(times)) / 5, indexing="ij")
    flicker = from_db(patchy_db * map_coordinates(knots, where, order=1))
    return rms_one(signal.istft(frames * flicker)[1][:, :N])


def sanding(swell=1.05, rasp_swell=0.85, catch_db=1., hiss_db=-1.02):
    """The hand speeds up and slows in each pass; the grit hisses and the paper rasps with its speed."""
    hiss, rasp = np.zeros((2, N))
    for start, end, db, rasp_db, roll_db in STROKES:
        turn = start - ROLL_S
        span = slice(max(int((turn - 0.008) * SR), 0), int((end + 0.018) * SR))
        speed = pass_speed(TIME[span], turn, end)
        since_bite = TIME[span] - start
        rolling = np.clip(0.5 - since_bite / BITE_S, 0, 1)
        grab = GRAB_SHARE * (1 - rolling) * np.exp(-np.maximum(since_bite, 0) / GRAB_S)
        grip = from_db(roll_db * (rolling - grab))
        # the louder of two overlapping passes wins; slow rubbing is duller
        hiss[span] = np.maximum(hiss[span], from_db(db) * grip * speed ** swell)
        rasp[span] = np.maximum(rasp[span], from_db(rasp_db) * grip * speed ** rasp_swell)
    catching = from_db(catch_db * flutter(130)) * snags()  # the grit catches and lets go
    grit = shifting(friction(HISS_COLOUR, grain_db=0.6, lag_s=0.00011), patchy_db=3.0)
    grit = irfft(rfft(grit) * from_db(panned(at_hz(HISS_PAN, BINS_HZ))), N)
    under_fingers = friction(RASP_FINGERS, grain_db=2.0, lag_s=0.00009)
    under_palm = friction(RASP_PALM, grain_db=2.2, lag_s=0.00009)
    backing = shifting(np.where(TIME < PALM_FROM_S, under_fingers, under_palm), patchy_db=2.5)
    # a short running mean rounds the corners of both envelopes
    hissing = from_db(hiss_db) * uniform_filter1d(hiss, size=90) * grit
    rasping = uniform_filter1d(rasp, size=90) * backing
    return catching * (hissing + rasping)


def scene():
    """Paper and plate close by, the workshop around them."""
    paper = sanding() + handling()
    steel = plate(KNOCKS) + clacks() + scraping()
    rumble = grinding(KNOCKS)
    room = workshop(from_db(-3.5) * paper + from_db(-6.0) * steel)
    return paper + steel + rumble + room + background()


def record(dry):
    """The bass is alike in both microphones; the hardest peaks overload softly; the top is cut."""
    mid, side = (dry[0] + dry[1]) / 2, (dry[0] - dry[1]) / 2
    side = signal.sosfiltfilt(signal.butter(2, ALIKE_BELOW_HZ, "high", fs=SR, output="sos"), side)
    pair = np.array([mid + side, mid - side])
    rounded = pair / (1 + (pair * pair) ** 3) ** (1 / 6)
    return signal.sosfilt(signal.ellip(12, 0.2, 70, CUTOFF_HZ, fs=SR, output="sos"), rounded)


dry = scene()
out = record(dry)
persist_wave(out)
```